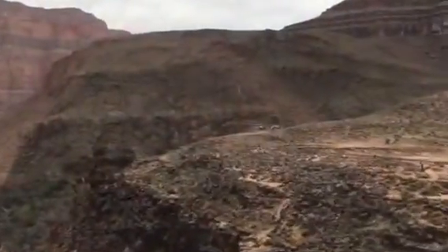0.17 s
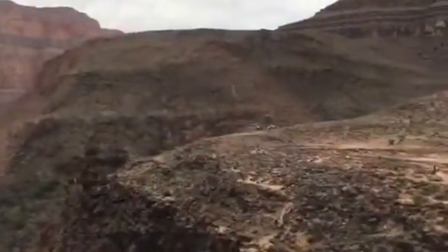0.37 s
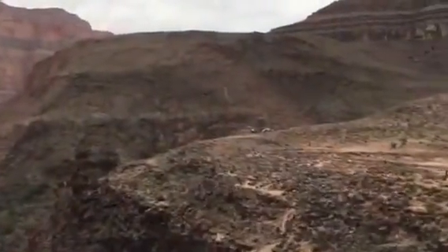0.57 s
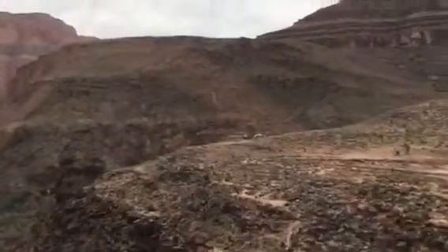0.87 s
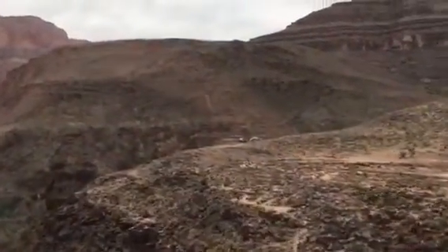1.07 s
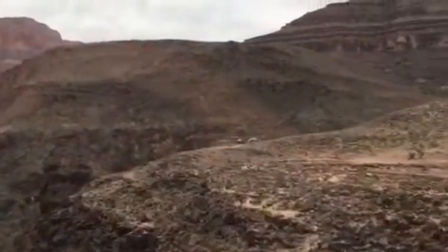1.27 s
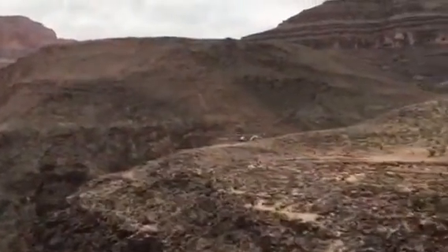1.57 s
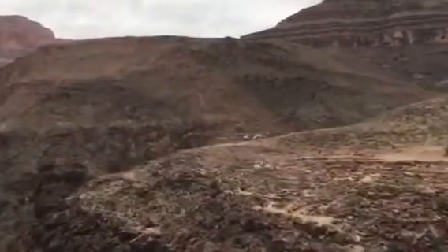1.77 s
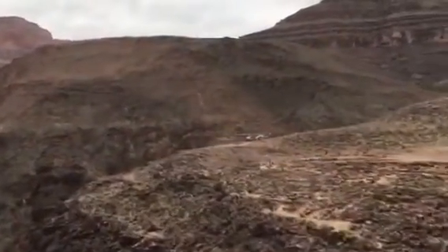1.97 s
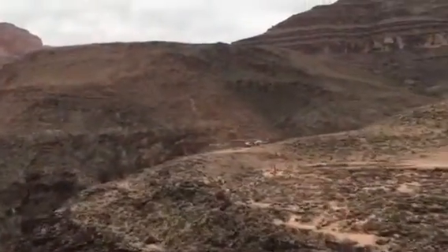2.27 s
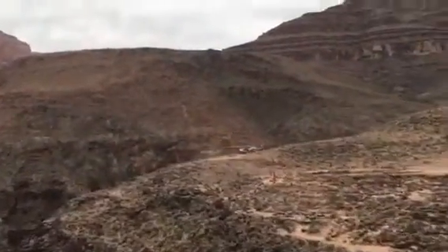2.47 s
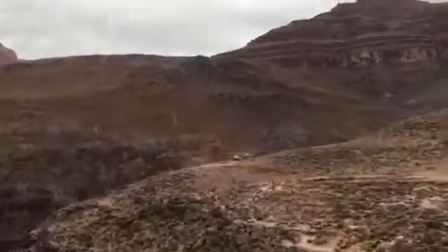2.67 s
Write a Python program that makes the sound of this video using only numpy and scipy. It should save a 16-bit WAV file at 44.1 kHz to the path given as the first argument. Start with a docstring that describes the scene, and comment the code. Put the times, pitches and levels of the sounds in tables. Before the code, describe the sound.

Inside a flying helicopter, blades throb fast above engine roar and a faint high whine.

```python
"""Rotor blades thud over a steady roar, heard inside a helicopter in level flight.
Each main rotor blade sends a pressure pulse and a swish of torn air into the cabin, which
booms after it. Engine and airflow make the roar, buffeting air rumbles underneath, and
engine noise rings in the housings. Gear mesh tones and a thin turbine whine sit on top."""
import sys
import numpy as np
from scipy import signal
from scipy.fft import rfft, irfft, next_fast_len
from scipy.io import wavfile

SR = 44100
rng = np.random.default_rng(int(sys.argv[2]) if len(sys.argv) > 2 else 0)


def to_wav(sig):
    """Store sig (one row per channel, or 1-D mono) as 16-bit WAV at the path in sys.argv[1].

    Samples outside -1..1 are clipped; the rate is SR.
    """
    pcm = np.clip(np.atleast_2d(sig), -1, 1) * 32767
    pcm = np.round(pcm).astype(np.int16)
    wavfile.write(sys.argv[1], SR, pcm.T)  # frames by channels


N = 123921
TIME_S = np.arange(N) / SR


def from_db(db):
    """Decibels to gain."""
    return 10 ** (np.asarray(db) / 20)


def unit_rms(x):
    """Scale to rms 1."""
    return x / np.sqrt(np.mean(x ** 2) + 1e-20)


def curves(rows):
    """One per-sample curve for each column after t/s."""
    times_s, *columns = np.transpose(rows)
    return [np.interp(TIME_S, times_s, column) for column in columns]


def drift(rate_hz):
    """Slow random wander, rms about 1."""
    hop, settle = 40, 2000
    pole = np.exp(-2 * np.pi * hop * rate_hz / SR)
    white = rng.standard_normal(N // hop + settle + 2)
    slow = signal.lfilter([1], [1, -2 * pole, pole * pole], white)[settle:]
    return np.interp(np.arange(N) / hop, np.arange(len(slow)), unit_rms(slow))


def noise(spectrum):
    """Shaped noise, rms 1, falling 12 dB/octave past both ends of the spectrum."""
    hz, db = np.transpose(spectrum)
    size = next_fast_len(N)
    bins_hz = np.maximum(np.arange(size // 2 + 1) * SR / size, 1)
    skirts = np.minimum(np.minimum(bins_hz / hz[0], hz[-1] / bins_hz), 1) ** 2
    gain = from_db(np.interp(np.log(bins_hz), np.log(hz), db)) * skirts
    return unit_rms(irfft(rfft(rng.standard_normal(size)) * gain, size)[:N])


def tone(hz, speed, waver_db):
    """Sine, rms about 1, that follows a relative shaft speed and wavers in level."""
    cycles = np.cumsum(hz * speed) / SR + rng.random()
    return np.sqrt(2) * np.sin(2 * np.pi * cycles) * from_db(waver_db * drift(2.7))


BLADE_PERIOD_S, FIRST_PASS_S = .051351, .0373
# How hard the blades bite the air: t/s, level/dB
BLADE_BITE = [(0, -3.5), (.14, 3.5), (.22, -20), (.44, 5.5), (.5, -2.5), (.6, 4.5), (.66, -5), (.76, -4),
              (.81, 3), (1.05, 0), (1.37, 0.5), (1.55, -1), (1.75, -2.5), (1.95, 2), (2.35, 2),
              (2.41, -5.5), (2.6, 0.5), (2.81, -2.5)]
# Single harder slaps: t/s, extra level/dB
HARD_SLAPS = [(2.04, 7), (2.194, 3.5), (2.656, 7)]

def blade_passes():
    """Running count of blade passes, and their bite in dB, gliding from pass to pass."""
    jitter_s = .00011 * drift(7.6)
    passes = (TIME_S - FIRST_PASS_S + jitter_s) / BLADE_PERIOD_S
    pass_times_s = FIRST_PASS_S + BLADE_PERIOD_S * np.arange(-1, N / SR / BLADE_PERIOD_S + 1)
    bite_db = np.interp(pass_times_s, *np.transpose(BLADE_BITE))
    bite_db -= .94 * rng.standard_normal(len(pass_times_s))
    for slap_s, extra_db in HARD_SLAPS:
        bite_db[np.argmin(abs(pass_times_s - slap_s))] += extra_db
    return passes, np.interp(TIME_S, pass_times_s, bite_db)


# Blade pulse spectrum: multiple of blade rate, relative level/dB
PULSE_HARMONICS = [(1, -55), (2, -21), (3, -22.5), (4, -34), (5, -34), (6, -28.5), (7, -22), (8, -22.5),
                   (9, -32), (11, -32), (13, -41), (14, -37), (15, -41), (16, -44), (17, -33.5), (18, -33),
                   (19, -34.5), (20, -37), (22, -53), (23, -40), (25, -55), (27, -43), (29, -46), (31, -52),
                   (33, -47), (35, -48), (37, -61), (41, -53), (46, -52), (53, -64), (59, -55), (66, -68)]
# Slow level changes in flight: t/s, throb/dB, boom/dB, knock/dB, buffeting/dB
FLIGHT_LEVELS = [(0, 0, -13, 1.5, 4.5), (.17, -3.5, -2, 1.5, 4), (.47, -0.5, -1, 2, -4.5),
                 (.8, -1, -1.5, 2, 0), (1.0, -4, 0, -0.5, -1.5), (1.4, -2.5, 0, 0, -8),
                 (1.9, -3, -0.5, -.5, 3), (2.3, -1.5, -5, -3, 4), (2.48, -2, -3, -1, 6.5),
                 (2.68, -1.5, -2.5, -5.5, 6.5), (2.81, -2, -4.5, -6.5, 9)]
THROB_TOP_HZ, BOOM_TOP_HZ, KNOCK_TOP_HZ = 105, 305, 420

def rotor_pulses(passes, bite_db):
    """A suction pulse per blade: deep throb, boom, knock and a crack that grows with the bite."""
    throb_db, boom_db, knock_db, _ = curves(FLIGHT_LEVELS)
    multiples, levels_db = np.transpose(PULSE_HARMONICS)
    pulses = np.zeros(N)
    for k in range(1, int(multiples[-1])):
        hz = k / BLADE_PERIOD_S
        if hz < THROB_TOP_HZ:
            band_db = throb_db + 1.2 * drift(6)
        elif hz < BOOM_TOP_HZ:
            band_db = boom_db + .12 * bite_db
        elif hz < KNOCK_TOP_HZ:
            band_db = knock_db + .12 * bite_db
        else:  # crack
            band_db = .45 * bite_db
        level_db = np.interp(k, multiples, levels_db) + band_db - .5
        pulses -= np.sqrt(2) * from_db(level_db) * np.cos(2 * np.pi * k * passes - cabin_lag(hz))
    return pulses


# Cabin resonances: f/Hz, width/Hz
CABIN_MODES = [(59, 6), (86, 34), (183, 10), (296, 14), (490, 14), (720, 35)]

def cabin_lag(hz):
    """Phase lag in radians: each resonance delays sound near its pitch, so the pulse rings on."""
    return sum(2 * np.arctan2(width_hz * hz, mode_hz ** 2 - hz ** 2)
               for mode_hz, width_hz in CABIN_MODES)


# Torn air spectrum: f/Hz, relative density/dB
SWISH_SPECTRUM = [(120, -1), (220, 1.5), (380, -0.5), (500, -9.5), (650, -2), (760, -33.5), (880, -14.5),
                  (1030, -16), (1150, -9.5), (1500, -29.5), (2000, -21), (3000, -29), (6000, -38.5)]
# Bright edge of a hard slap: f/Hz, relative density/dB
RASP_SPECTRUM = [(600, -34), (820, 6.5), (1020, -3.5), (1180, 5.5), (1500, -5), (2100, -10), (2700, -37.5),
                 (6000, -35)]
SWISH_LAG_S, SWISH_RISE_S, SWISH_FALL_S = .0026, .0049, .013
RASP_LAG_S, RASP_WIDTH_S = .0015, .0063

def rotor_swish(passes, bite_db):
    """Torn air swells and dies around every pulse; a hard bite adds a short bright rasp."""
    from_pass_s = ((passes + .5) % 1 - .5) * BLADE_PERIOD_S
    from_peaks_s = [from_pass_s - SWISH_LAG_S + k * BLADE_PERIOD_S for k in (-1, 0, 1)]
    swell = sum(np.exp(np.minimum(s / SWISH_RISE_S, -s / SWISH_FALL_S)) for s in from_peaks_s)
    burst = np.exp(-.5 * ((from_pass_s - RASP_LAG_S) / RASP_WIDTH_S) ** 2)
    swish = from_db(-27.5 + bite_db) * swell * noise(SWISH_SPECTRUM)
    rasp = from_db(-38 + 1.63 * bite_db) * burst * noise(RASP_SPECTRUM)
    return swish + rasp


# Engine and airflow spectrum: f/Hz, relative density/dB
ROAR_SPECTRUM = [(150, 3), (350, -4.5), (550, -6.5), (900, -9.5), (1400, -14), (1580, -13.5), (1850, -18),
                 (2000, -20), (2550, -19.5), (2850, -24), (3350, -17), (3800, -20), (4100, -25),
                 (4400, -22.5), (4900, -26.5), (5500, -24.5), (6600, -23), (7700, -32.5), (9000, -31.5),
                 (9550, -36.5), (10400, -35), (11300, -30.5), (12500, -36.5), (15500, -39.5)]
# Treble of the roar: t/s, relative level/dB
HISS_LEVELS = [(0, 0), (.6, 0), (1.1, -.5), (2.1, -0.5), (2.55, 2), (2.81, 1)]

def engine_and_airflow(passes, roar_db=-32, hiss_from_hz=1100):
    """Steady roar whose hiss swells a little with each blade."""
    roar = from_db(roar_db) * noise(ROAR_SPECTRUM)
    hiss = signal.sosfilt(signal.butter(1, hiss_from_hz, "high", fs=SR, output="sos"), roar)
    blade_ripple = 1 + .055 * np.cos(2 * np.pi * passes)
    hiss_gain = from_db(curves(HISS_LEVELS)[0]) * blade_ripple
    return roar + (hiss_gain - 1) * hiss


# Buffeting air spectrum: f/Hz, relative density/dB
RUMBLE_SPECTRUM = [(15, -20), (30, -13), (45, -4), (70, -1), (105, 0), (150, -5), (220, -8), (350, -18)]

def buffeting(base_db=-27):
    """Buffeting air: a low rumble that slowly rises and falls."""
    buffeting_db = curves(FLIGHT_LEVELS)[-1]
    return from_db(base_db + buffeting_db) * noise(RUMBLE_SPECTRUM)


# Housing resonances: f/Hz, width/Hz, rms level/dB
HOUSING_MODES = [(1423, 21, -49), (1785, 150, -48.5), (2140, 28, -53.5), (2390, 27, -56), (2564, 44, -53.5),
                 (3287, 180, -52.5), (3907, 90, -57.5), (4340, 38, -57.5), (9600, 57, -61.5)]

def housings():
    """Engine noise rings in narrow metallic resonances."""
    ringing = np.zeros(N)
    for hz, width_hz, db in HOUSING_MODES:
        resonator = signal.iirpeak(hz, hz / width_hz, fs=SR)
        ringing += from_db(db) * unit_rms(signal.lfilter(*resonator, rng.standard_normal(N)))
    return ringing


# Main gear mesh tones: low f/Hz, high f/Hz
MAIN_MESH_HZ = (1298, 1716.3)
# Main mesh tones before flutter: t/s, low tone level/dB, high tone level/dB
MAIN_MESH_LEVELS = [(0, -39.5, -41.5), (.4, -39.5, -42.5), (.9, -40, -43), (1.3, -41, -41),
                    (1.7, -44.5, -42.5), (2.1, -39.5, -41.5), (2.5, -47, -44), (2.81, -44, -46.5)]
# Other gear tones before flutter: f/Hz, level/dB
MINOR_GEARS = [(1104, -57), (8040, -71)]

def gearbox(flutter_db=1.35):
    """Fluttering mesh tones that share one slightly unsteady drive."""
    speed = 1 + .00042 * drift(1.87)
    gears = list(zip(MAIN_MESH_HZ, curves(MAIN_MESH_LEVELS))) + list(MINOR_GEARS)
    return sum(from_db(db + flutter_db * drift(27)) * tone(hz, speed, waver_db=.9) for hz, db in gears)


# Compressor whine before flutter: t/s, level/dB
WHINE_LEVELS = [(0, -52.5), (.3, -51), (.7, -50.5), (1.05, -53.5), (1.2, -61), (1.8, -58.5), (2.26, -64),
                (2.45, -53), (2.62, -49.5), (2.81, -57)]
# Sideband offsets from the whine: multiple of shaft rate
SIDEBAND_ORDERS = [-4, -3, -1, 1, 2, 4, 5, 9]
# Sidebands in the same order: level/dB
SIDEBAND_LEVELS = [-72, -69.5, -69, -64, -67.5, -70, -78, -78]
WHINE_HZ, SHAFT_HZ = 11202, 134.9

def turbine(flutter_db=.9):
    """Compressor whine with sidebands spaced by the shaft rate."""
    speed = 1 + .00015 * drift(1.2)
    sidebands = sum(from_db(db) * tone(WHINE_HZ + order * SHAFT_HZ, speed, waver_db=.5)
                    for order, db in zip(SIDEBAND_ORDERS, SIDEBAND_LEVELS))
    whine_db = curves(WHINE_LEVELS)[0] + flutter_db * drift(30)
    return from_db(whine_db) * tone(WHINE_HZ, speed, waver_db=.5) + sidebands


def scene():
    """Rotor, air and machinery from one seat, mono."""
    passes, bite_db = blade_passes()
    rotor = rotor_pulses(passes, bite_db) + rotor_swish(passes, bite_db)
    return (rotor + engine_and_airflow(passes) + buffeting() + housings() + gearbox() + turbine())[None]


FADE_S, CUTOFF_HZ = .004, 15700

def record(dry):
    """Short fades at both ends, then a steep low-pass."""
    fade = np.clip(np.minimum(TIME_S, TIME_S[::-1]) / FADE_S, 0, 1)
    lowpass = signal.ellip(12, .1, 90, CUTOFF_HZ, fs=SR, output="sos")
    return signal.sosfilt(lowpass, dry * fade)


dry = scene()
out = record(dry)
to_wav(out)
```